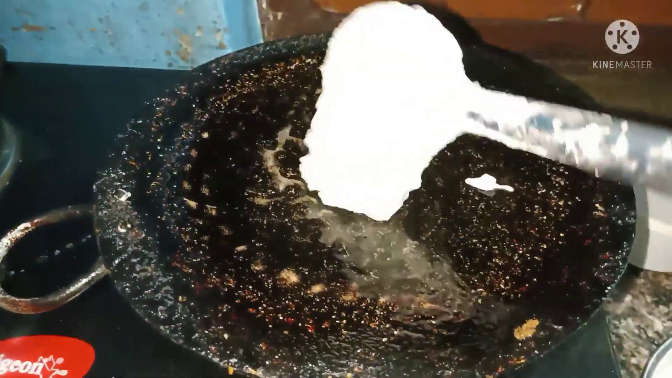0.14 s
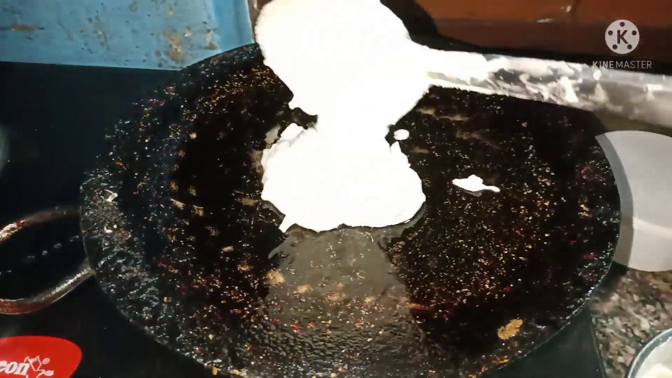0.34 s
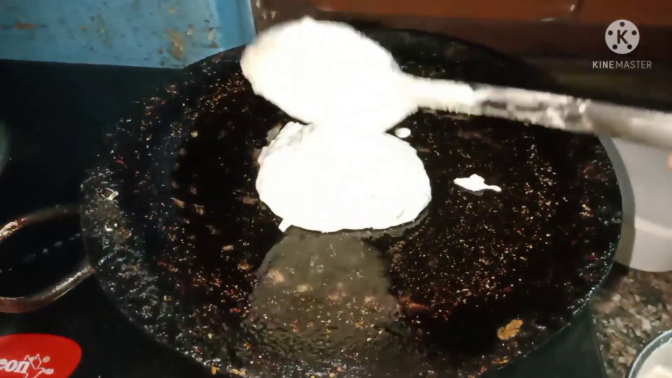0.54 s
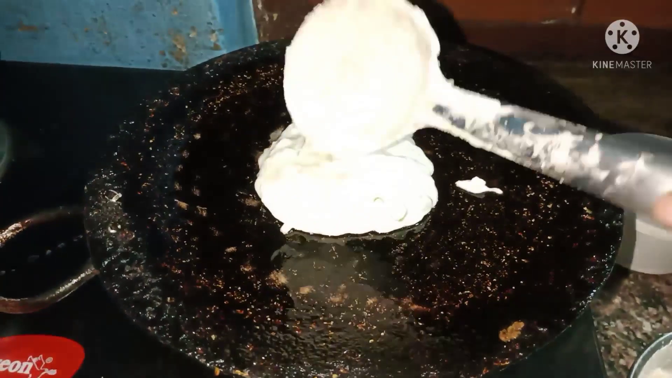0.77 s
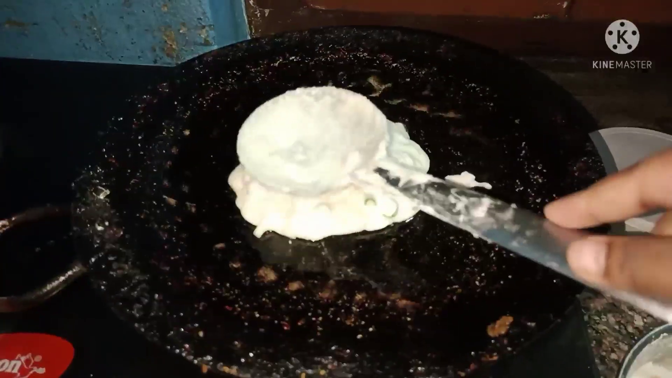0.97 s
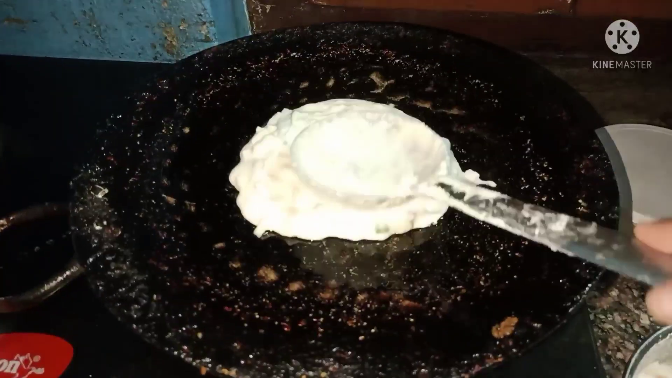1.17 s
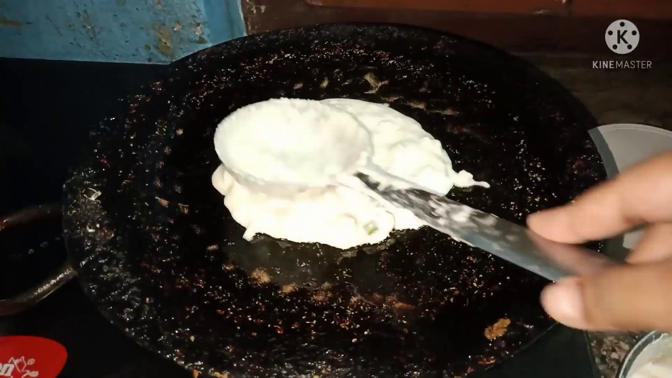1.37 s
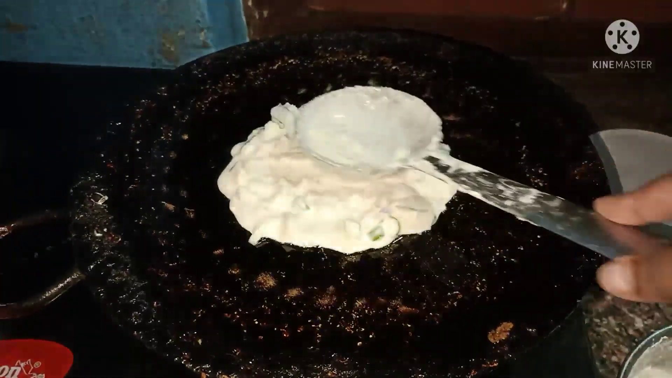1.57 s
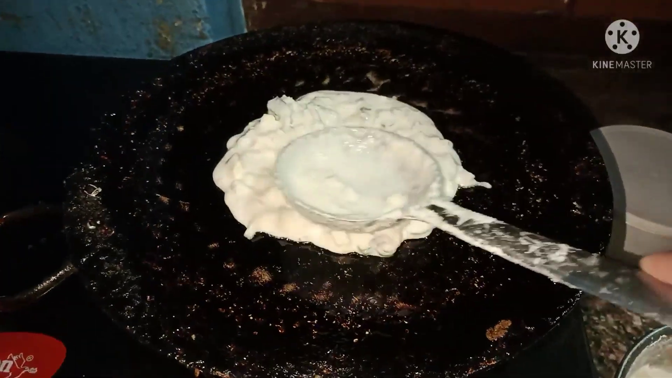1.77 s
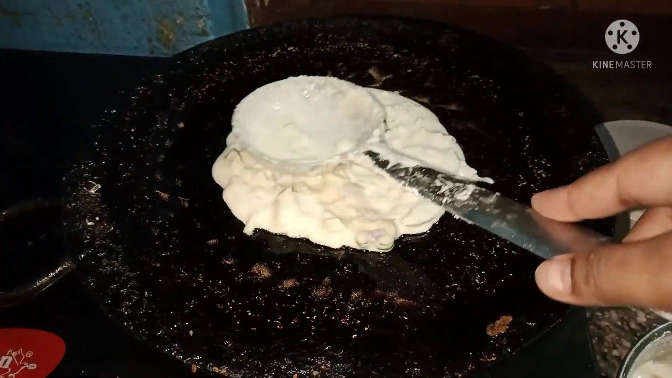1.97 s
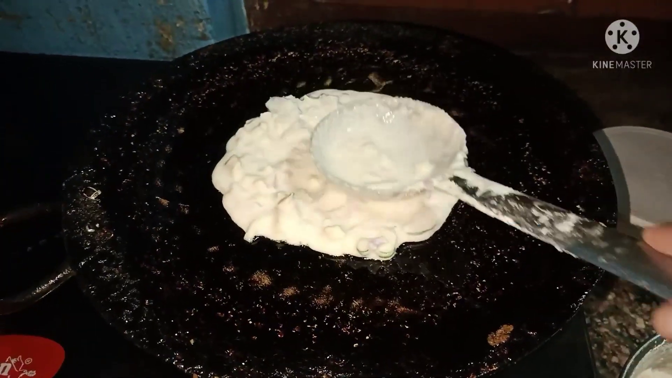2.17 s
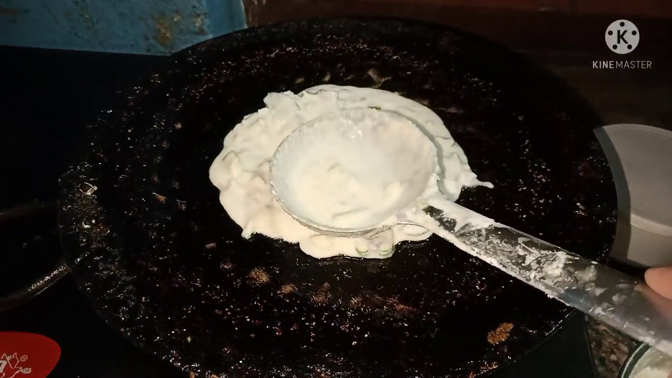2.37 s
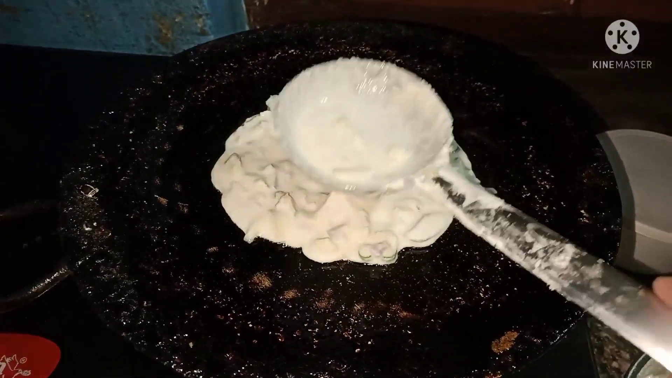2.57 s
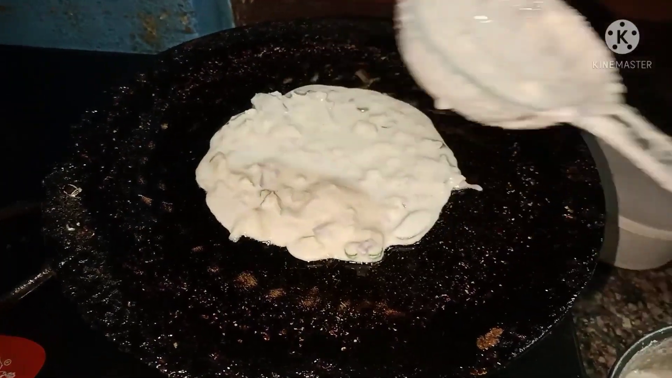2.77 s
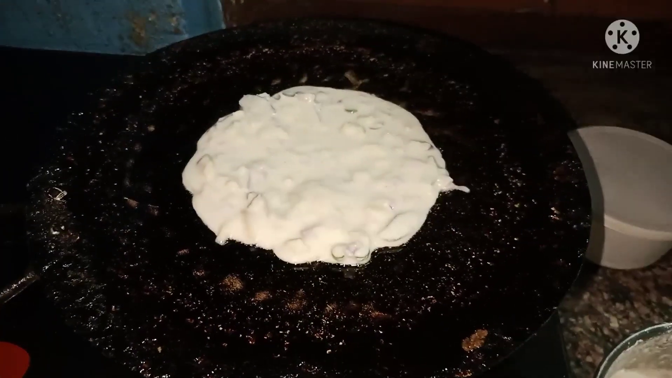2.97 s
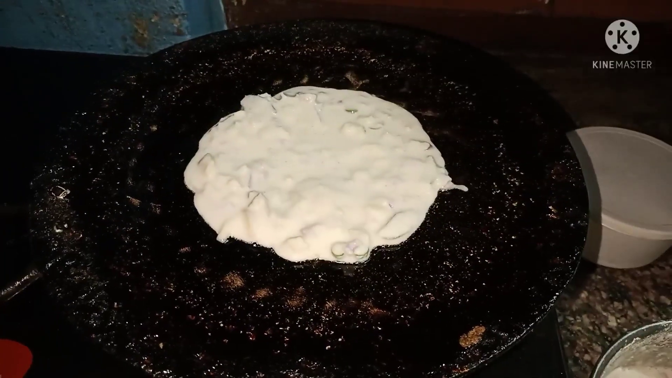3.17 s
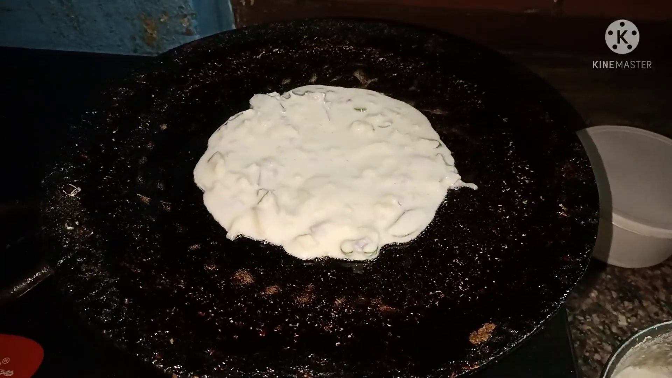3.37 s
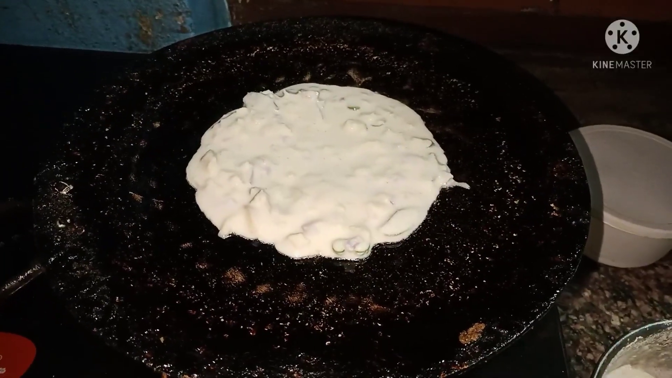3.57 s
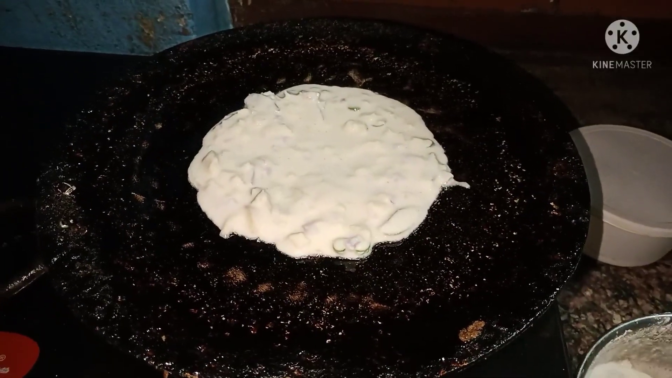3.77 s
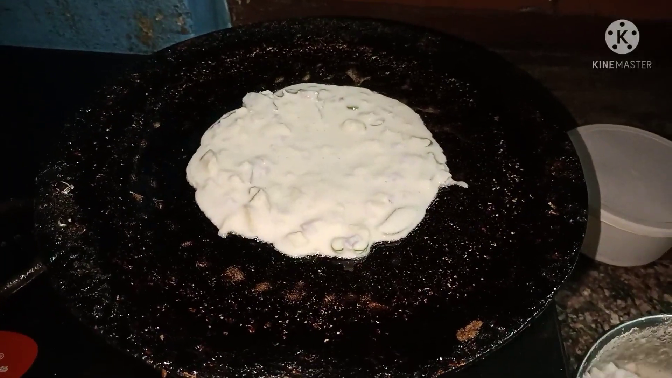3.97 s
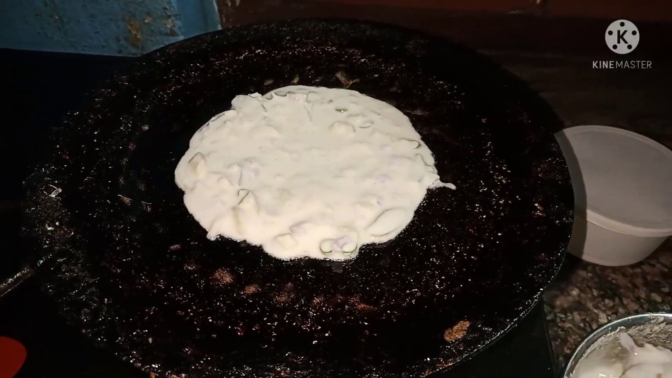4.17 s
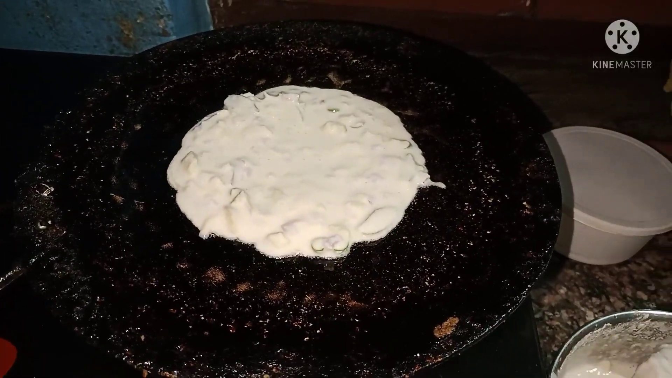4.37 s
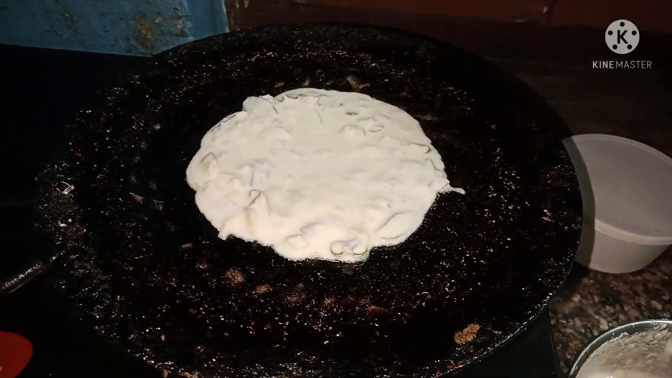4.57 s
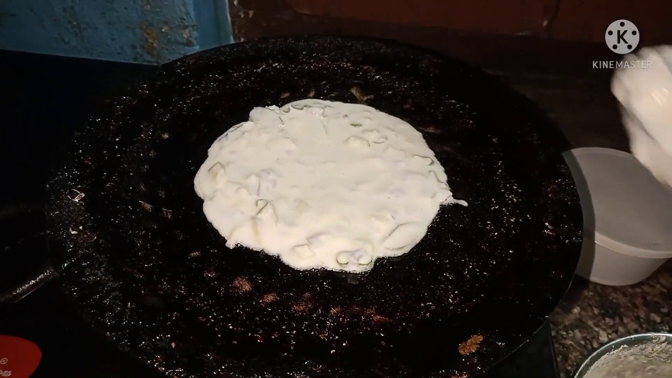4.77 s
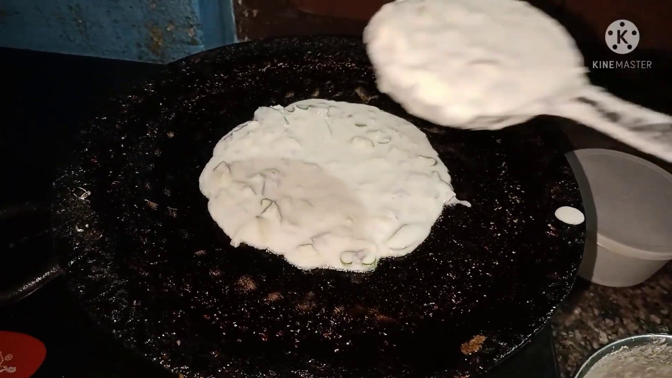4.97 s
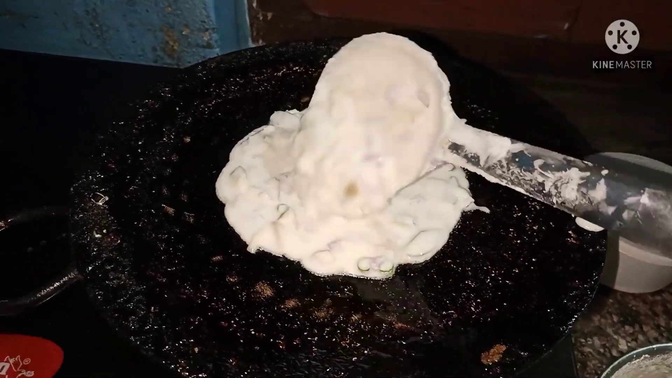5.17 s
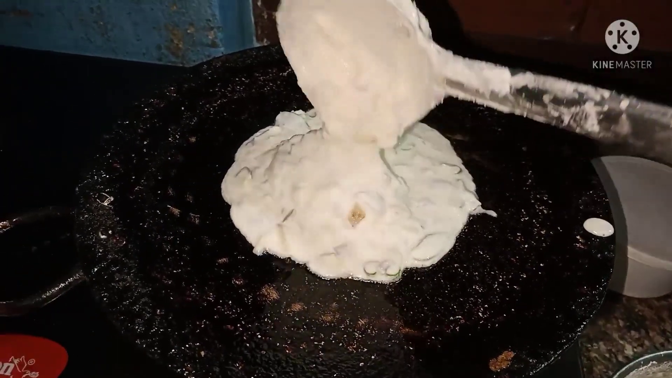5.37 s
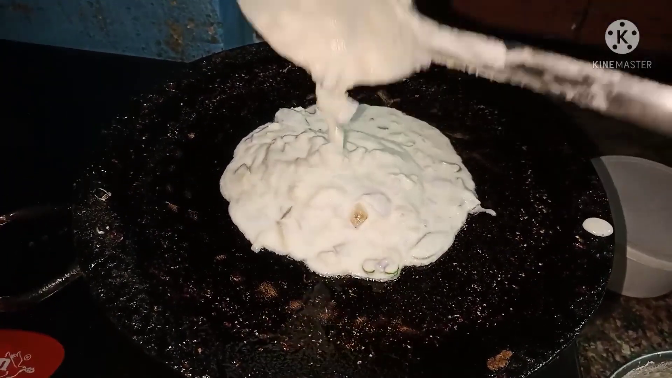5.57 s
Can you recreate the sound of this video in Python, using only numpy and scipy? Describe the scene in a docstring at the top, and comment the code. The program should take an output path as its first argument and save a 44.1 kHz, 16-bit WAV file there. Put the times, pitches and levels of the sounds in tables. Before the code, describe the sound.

Close, harsh sizzling as batter is poured and spread on hot iron, low blubbing under the ladle, thinning to sparse crackle and sputters.

```python
"""Batter sizzles on a hot iron griddle, close to the microphones in a small kitchen.
Random clicks stand for bursting steam bubbles; filters give them pitch and let the iron ring.
The sizzle thins to a fine fizz with single spits: cracks and bursts of noise that die away.
Swelling low tones make the ladle's soft knocks, the plops and the big bubbles; narrow noise makes
the singing edge and the glugging steam pockets. A faint rumble of the kitchen lies underneath."""
import sys
import numpy as np
from scipy import signal
from scipy.fft import rfft, irfft, next_fast_len
from scipy.io import wavfile

SR = 44100
rng = np.random.default_rng(int(sys.argv[2]) if len(sys.argv) > 2 else 0)


def inscribe(sig):
    """Save sig as 16-bit PCM at rate SR to the path in sys.argv[1].

    A 1-D sig is mono; a 2-D sig holds one channel per row.
    Samples are clipped to [-1, 1] before scaling.
    """
    pcm = np.round(np.clip(np.atleast_2d(sig).T, -1, 1) * 32767)
    wavfile.write(sys.argv[1], SR, pcm.astype(np.int16))


N = 247842  # samples, about 5.62 s
T = np.arange(N) / SR  # time of each sample, s

# Every pan or left-right value below is positive towards the left.
# Levels of layers are set before the small trims in their functions.

# colour of the steady room rumble: [f/Hz, gain/dB]
KITCHEN_COLOUR = [(20, -31), (45, -5), (70, -5), (90, -4.5), (118, 6), (145, 1.5), (167, 8), (190, 2),
                  (300, -3), (600, -9.5), (1200, -10.5), (3000, -30)]

# the batter hits the iron, boils hardest as the pool fills, and dies down as it sets: [t/s, level/dB]
BOIL_LEVEL = [(0.03, -50), (0.04, -37), (0.1, -40), (0.2, -34.5), (0.36, -33.5), (0.44, -30.5),
              (1.1, -32.5), (2.2, -35.5), (2.8, -38), (2.91, -42.5), (2.97, -40), (3.46, -45), (3.54, -44),
              (3.66, -42), (3.71, -50.5), (3.77, -45), (4.09, -46.5), (4.17, -53.5), (5.62, -63)]
# as the batter sets, bubbles come fewer and stand more apart: [t/s, factor on bubbles per second]
CROWDING = [(0.3, 1.15), (2.2, 0.8), (3.6, 0.44), (4.3, 0.23)]
# once the rim has set, steam gets out in separate puffs:
# [start t/s, length/s, swell of boiling/dB, swell of spray/dB, swell of fizz/dB]
PUFFS = [(2.957, 0.18, 0.5, 1, 1), (3.082, 0.18, 2, 1.5, -0.5), (3.428, 0.24, 0.5, 0.5, 3),
         (3.757, 0.11, 1.5, 4, 3.5), (3.96, 0.082, 0.5, 3.5, 1), (4.383, 0.13, 4, 11.5, 3.5),
         (4.637, 0.13, 5, 5.5, 2.5), (4.832, 0.069, 6.5, 13, 4), (4.961, 0.064, 4.5, 9.5, 2.5),
         (5.083, 0.2, 2, 5.5, 4), (5.353, 0.13, 7.5, 9, 5), (5.5, 0.096, 5, 7, 8.5)]
# colour of the boiling bubbles: [f/Hz, gain/dB]
SIZZLE_COLOUR = [(800, -30), (1300, -18), (1550, -5.5), (1900, 2), (2400, 1), (2680, -1.5), (3000, -4),
                 (3600, -11), (5000, -11), (9000, -51.5)]
# colour of the fine spray of oil: [f/Hz, gain/dB]
SPRAY_COLOUR = [(1500, -27), (2400, -21), (3400, 6), (4000, 3.5), (4900, -1.5), (5900, 2), (7000, -2),
                (9000, -12), (13000, -50.5)]
# ringing of the iron: [f/Hz, width/Hz, lift on the left/dB, lift on the right/dB]
IRON_RINGING = [(1387, 16, 9, 5), (1782, 20, 14, 3), (1965, 70, 1, 1), (2040, 55, 3.5, 4),
                (2277, 16, 12, 6), (2530, 70, 6, 4), (2960, 160, 2, 2), (3004, 24, 12, 12),
                (4570, 50, 6, 4), (5735, 40, 6, 2), (6490, 40, 6, 1)]

# bubbles under the thick of the batter: [t/s, level/dB]
FROTH_LEVEL = [(0.11, -52), (0.18, -43), (1.1, -43.5), (2.7, -46), (3.12, -53.5), (3.36, -69.5),
               (3.58, -66), (3.88, -72), (4.1, -74.5), (5.62, -84)]
# colour of these middling bubbles: [f/Hz, gain/dB]
MIDDLING_COLOUR = [(350, -10.5), (480, 4.5), (575, -3), (660, -3), (735, 3), (950, 3), (1150, 0),
                   (1400, -4.5), (1650, -0.5), (2400, -35)]

# tiny bursts in the oil film: [t/s, level/dB]
FIZZ_LEVEL = [(0.03, -49.5), (0.042, -46), (0.45, -41.5), (1.25, -41.5), (2.0, -46), (2.6, -46.5),
              (3.35, -48.5), (4.3, -48), (5.62, -54.5)]
# colour of the tiny bursts: [f/Hz, gain/dB]
FIZZ_COLOUR = [(1100, -51), (2000, -65), (3600, -21.5), (5200, 0), (6800, 1), (8000, 1), (10200, -3),
               (12500, 2.5), (14000, 3), (15500, 1)]

# the thin edge of the batter sings as it skates on steam; two filter passes make each whistle
# about a third narrower than its width setting: [f/Hz, width setting/Hz, level/dB, rise/s, fall/s]
SINGING = [(3424, 330, -42.5, 0.0051, 0.36), (5750, 420, -45, 0.11, .16), (5900, 230, -47, 0.072, 1.9)]

# droplets that spit, levels before colouring: [t/s, level/dB, left-right/dB, weight of mid-range/dB]
SPITS = [(0.0375, -52, -8, 4), (0.375, -30, 4, -12), (0.4283, -20, 4, -13), (0.8871, -24.5, -1, 5),
         (1.1238, -24, -4, -2), (1.157, -20, -6, -2), (1.4492, -21.5, -4, 0.5), (1.5723, -30, 2, 4),
         (2.391, -30, -1, -5), (2.4543, -28, 0, -5), (2.53, -26.5, 0, -3), (2.607, -31, 0, 4),
         (2.772, -30, 4, -5), (2.875, -25.5, -3, 0.5), (2.9773, -33, -2, 5), (3.2207, -25.5, 0, -2),
         (3.439, -28, -5, 2), (3.481, -29.5, -6, 3), (3.5657, -30, 0, -11), (3.6719, -34, 4, -6),
         (3.7395, -30, -6, -2), (3.7947, -31, -6, -4), (3.8323, -30.5, -9, -1), (3.8712, -27, 4, -4),
         (3.9129, -31, 5, -13), (4.006, -29, -4, 0.5), (4.0466, -31, 1.5, -9), (4.061, -27, -3, -1),
         (4.3725, -26, 0, -1), (4.4673, -30.5, -3, 1), (4.549, -34, 1, -1), (4.6503, -25.5, -3, -2),
         (4.794, -31, 1, -6), (4.8776, -38, 10, 3), (4.974, -32, 3, -12), (5.034, -34, 3, -2),
         (5.1102, -35, 8, -3), (5.264, -35, 10, -4), (5.3792, -24, 2, -1.5), (5.602, -26, 8, -23)]
# colour of a spit's sharp snap: [f/Hz, gain/dB]
SNAP_COLOUR = [(1000, -39), (4000, -50), (7000, -26), (10000, -2.5), (13500, 12), (16000, 7)]
# colour of a spit's mid-range: [f/Hz, gain/dB]
SPIT_BODY_COLOUR = [(1000, -24), (2500, -1), (6500, 9), (10000, 0.5), (16000, -28)]

# gurgles of big bubbles, squeezed out by the ladle or breaking through the batter:
# [start t/s, length before the fall/s, level/dB]
GURGLES = [(0.487, 0.31, -66), (0.78, 0.24, -59), (0.93, 0.466, -59), (1.485, 0.27, -63),
           (1.8, 0.37, -65.5)]
# colour of the big bubbles: [f/Hz, gain/dB]
BIG_COLOUR = [(170, -21), (270, -15), (305, -5), (352, 3.5), (430, 4), (500, -6), (620, -16), (850, -19)]
# single big bubbles from under the ladle: [start t/s, length/s, peak level/dB, middle f/Hz]
BLUBS = [(0.55, 0.081, -57, 343), (0.625, 0.066, -55, 629), (0.705, 0.07, -59, 343),
         (0.805, 0.077, -52, 433), (0.815, 0.093, -49.5, 578), (0.85, 0.1, -57, 345),
         (0.935, 0.06, -55, 355), (1.005, 0.065, -48.5, 356), (1.01, 0.095, -51, 586),
         (1.045, 0.076, -45.5, 353), (1.12, 0.077, -49.5, 620), (1.145, 0.11, -56, 342),
         (1.25, 0.075, -51, 347), (1.26, 0.068, -53, 491), (1.35, 0.062, -52, 367),
         (1.505, 0.075, -56, 349), (1.635, 0.08, -54.5, 351), (1.715, 0.1, -57, 488),
         (1.805, 0.071, -59.5, 358), (1.895, 0.12, -55, 351), (1.95, 0.1, -56.5, 484),
         (1.985, 0.064, -54, 345), (2.055, 0.069, -57, 356), (2.145, 0.09, -60, 364),
         (2.49, 0.06, -62.5, 362), (2.68, 0.057, -62, 357)]

# soft knocks of the ladle and plops of batter: [start t/s, peak level/dB, f/Hz, half the rise time/s]
PLOPS = [(0.794, -58, 117, 0.012), (1.246, -55.5, 114, 0.013), (2.48, -58, 113, 0.024),
         (3.049, -61, 124, 0.014), (3.318, -40, 379, 0.0097), (3.322, -49, 224, 0.0035),
         (3.873, -56, 120, 0.02), (4.398, -71, 131, 0.011), (5.139, -61, 115, 0.013),
         (5.414, -60, 122, 0.016)]

# dull rumble as the ladle is handled: [centre t/s, level/dB, length/s]
BUMPS = [(1.295, -66, 0.12), (2.53, -65, 0.1), (3.922, -68, 0.13), (4.514, -68, 0.23), (5.17, -62, 0.046),
         (5.447, -72, 0.089)]
# colour of that rumble: [f/Hz, gain/dB]
BUMP_COLOUR = [(20, -18), (60, -12.0), (130, -7), (220, -32), (500, -46)]

# pockets of steam in the setting batter: [start t/s, length/s, level/dB, first f/Hz, last f/Hz]
GLUGS = [(3.11, 0.1, -56.5, 931, 940), (3.18, 0.22, -65.5, 551, 540), (3.21, 0.099, -59.5, 827, 840),
         (3.33, 0.11, -65.5, 533, 513), (3.37, 0.14, -60.5, 1380, 1110), (3.377, 0.137, -60, 410, 340),
         (3.485, .07, -69, 863, 1000), (3.55, 0.086, -64, 1226, 1130), (3.565, .1, -61, 411, 350),
         (3.58, 0.087, -64, 498, 550), (3.605, 0.075, -62, 955, 940), (3.62, 0.074, -56, 1415, 1350),
         (3.665, 0.084, -60.5, 394, 350), (3.78, 0.085, -61, 916, 825), (3.78, 0.22, -67, 755, 777),
         (3.87, .08, -66, 1200, 1190), (3.905, 0.077, -67, 367, 384), (4.11, 0.057, -67, 440, 290),
         (4.39, .06, -65, 232, 180), (5.4, 0.053, -66, 370, 340), (5.4, 0.074, -69.5, 590, 544)]

# likeness of the two channels: [f/Hz, likeness 0-1]
CHANNEL_LIKENESS = [(60, 1), (200, 0.95), (400, 0.64), (700, 0.8), (850, 0.41), (1600, 0.45), (1780, 0),
                    (2000, 0.85), (2300, 0), (2600, 0.1), (3000, 0.13), (3300, 0), (6000, 0)]
# how far the left channel leads the right: [f/Hz, phase/radians]
LEFT_LEAD = [(200, 0.11), (600, 0.2), (720, -0.24), (900, -1.45), (1200, -0.68), (1500, -0.63),
             (2000, 0.32), (2300, -0.24), (3000, -0.26)]
# difference in colour of the two microphones: [f/Hz, left-right/dB]
LEFT_RIGHT_COLOUR = [(60, 2), (110, 0.5), (380, 1), (580, -5), (760, 1.5), (980, -2.5), (1400, -3.5),
                     (2380, 0.5), (5000, -0.5), (7400, 3), (10000, -2.5), (12000, 0), (15000, 5)]

PUFF_RISE_S, PUFF_FALL_S = 0.014, 0.035
FROTH_PUFF = 0.96  # the middling bubbles swell by this many times the boiling's puff dB
SPRAY_DB, SPRAY_FOLLOW = -10, 0.95  # spray: this offset plus this share of the boiling's dB
SING_START_S, SING_HOLD_S = 0.028, 0.14  # the hold includes the rise
GURGLE_RISE_S, GURGLE_FALL_S = 0.053, 0.067
GLUG_NARROWNESS = 5.5  # pitch divided by width setting
# the wider the pool, the lower the bubbles that fit under it: lowest pitch at first and later
DROP_HZ, POOL_HZ, SPREAD_S = 1930, 716, 0.19
LIFT_DB = -47  # a gurgle this strong lifts the batter enough to halve that pitch
ROOM_T60_S, ROOM_DB = 0.11, -4  # time for the echo to fall 60 dB, echo level
EDGE_HZ = 15760  # upper edge of the band


def amp(db):
    """Turns dB into a factor on the waveform."""
    return 10 ** (np.asarray(db) / 20)


def evened(x):
    """Scales a stereo pair so that the average of its channels has rms 1."""
    return x / np.sqrt(np.mean(x.mean(0) ** 2) + 1e-20)


def read(points, hz):
    """Reads a curve joined by straight lines over log frequency."""
    f, value = np.transpose(points)
    return np.interp(np.log(hz + 1), np.log(f + 1), value)


def level(rows):
    """Turns a dB curve over time into a gain for each sample."""
    return amp(np.interp(T, *np.transpose(rows)))


def add(mix, s, sound):
    """Mixes a sound in at time s, cut off at the end of the scene."""
    start = max(round(s * SR), 0)
    part = mix[:, start:][:, :sound.shape[-1]]
    part += sound[..., :part.shape[1]]


def drift(per_s):
    """Wanders at random with spread 1, held within bounds by tanh."""
    knots = np.arange(0, T[-1] + 1, 1 / (2 * per_s))
    x = np.interp(T, knots, np.tanh(rng.standard_normal(len(knots))))
    return x / x.std()


def envelope(s, length, rise_s, fall_s):
    """Rises from time s, holds until its length is over, and falls."""
    rise = np.clip((T - s) / rise_s, 0, 1)
    fall = np.clip(1 - (T - s - length) / fall_s, 0, 1)
    return rise * fall


def colour(x, points, modes=(), size=8192):
    """Filters with a spectrum and resonances, so that each click rings only after its start."""
    hz = np.fft.rfftfreq(size, 1 / SR)
    power = np.ones((2, len(hz)))
    for centre, width, *lift_db in modes:
        lift = amp(np.maximum(lift_db, 0))[:, None] ** 2 - 1
        power += lift / (1 + (2 * (hz - centre) / width) ** 2)
    log_gain = np.log(amp(read(points, hz)) * np.sqrt(power))
    # the phase that puts the response as early as possible follows from the gain
    mirrored = np.hstack([log_gain, log_gain[:, -2:0:-1]])
    causal = np.exp(np.conj(signal.hilbert(mirrored)))
    response = np.fft.ifft(causal).real[:, :size // 2]
    return signal.oaconvolve(x, response, axes=1)[:, :N]


def ports(x):
    """Makes long waves nearly alike at both microphones and short ones different."""
    size = next_fast_len(N, True)
    (a, b), hz = rfft(x, size), np.fft.rfftfreq(size, 1 / SR)
    same = np.clip(read(CHANNEL_LIKENESS, hz), 0, 1)
    left = same * a + np.sqrt(1 - same ** 2) * b
    left = left * np.exp(1j * read(LEFT_LEAD, hz))
    return irfft(np.array([left, a]), size)[:, :N]


def room(x):
    """Adds the short, dense echo of stove and walls as fading noise."""
    t = T[:SR // 2]
    tail = rng.standard_normal((2, len(t))) * amp(-60 * t / ROOM_T60_S)
    tail *= t > 0.002  # the echo starts after 2 ms
    tail /= np.linalg.norm(tail, axis=1, keepdims=True)
    return x + amp(ROOM_DB) * signal.oaconvolve(x, tail, axes=1)[:, :N]


def clicks(per_s, spread_db):
    """Random clicks, fewer as the batter sets; the spread makes a few much louder, or softer if negative."""
    crowd = np.interp(T, *np.transpose(CROWDING))
    size = amp(spread_db * np.minimum(rng.exponential(1, (2, N)), 5))
    chance = rng.uniform(-1, 1, (2, N))
    happens = abs(chance) < crowd * per_s / SR
    # fewer clicks are made larger, to keep the average power
    return size / np.sqrt(crowd) * np.sign(chance) * happens


def bursts(per_s, spread_db, clump_db, clumps_per_s, count=3):
    """Bubbles burst in clumps at several spots on the iron, each spot with its own echo."""
    out = 0
    for _ in range(count):
        spot = clicks(per_s / count, spread_db) * amp(clump_db * drift(clumps_per_s))
        out = out + room(spot)
    return ports(out)


def ringing(low_hz, high_hz, per_s, cycles, spread_db, count=24):
    """Single bubbles, each ringing at the pitch of its own size and fading to 37 % in some cycles."""
    hits, which, out = clicks(per_s, spread_db), rng.integers(0, count, (2, N)), 0
    for k, hz in enumerate(np.geomspace(low_hz, high_hz, count)):
        turn = 2 * np.pi * hz / SR
        r = np.exp(-hz / cycles / SR)
        resonance = [1, -2 * r * np.cos(turn), r * r]
        ring = signal.lfilter([np.sqrt(1 - r)], resonance, hits * (which == k))
        out = out + ring * np.sin(turn)
    return ports(out)


def spatters(per_s, spread_db, decay_s):
    """Tiny pops of oil, each a sudden spray of noise that dies within milliseconds."""
    fade = np.exp(-2 / (decay_s * SR))  # of the energy, per sample
    energy = signal.lfilter([1], [1, -fade], clicks(per_s, spread_db)[0] ** 2)
    return np.sqrt(energy) * rng.laplace(size=(2, N))


def whistle(hz, width_hz):
    """Steam sounds a narrow resonance: slowly fluttering noise moved to the pitch curve hz."""
    r = np.exp(-np.pi * width_hz / SR)
    warm_up = SR // 10
    a, b = rng.standard_normal((2, 2, len(hz) + warm_up))
    flutter = signal.lfilter([1], [1, -2 * r, r * r], a + 1j * b)[:, warm_up:]
    x = (flutter * np.exp(2j * np.pi * np.cumsum(hz) / SR)).real
    return x / x.std(1, keepdims=True)


def puffing():
    """Gains by which the puffs of steam swell the boiling, the spray and the fizz."""
    swells_db = 0
    for s, length, *swell_db in PUFFS:
        swells_db = swells_db + np.outer(swell_db, envelope(s, length, PUFF_RISE_S, PUFF_FALL_S))
    return amp(swells_db)


def spurting(per_s=13, fresh_db=1.5, set_db=6.0, length_s=0.013, count=120):
    """Small pockets of steam break out at random; they stand out once the rim has set."""
    gaps, sizes = rng.uniform(0.2, 1.8, (2, count))
    rim_set_s = CROWDING[-1][0]
    out = np.zeros((1, N))
    for s, size in zip(np.cumsum(gaps) / per_s, sizes):
        swell_db = np.sqrt(size) * (set_db if s > rim_set_s else fresh_db)
        add(out, s, swell_db * np.hanning(round(2 * length_s * SR)))
    return amp(out[0])


def gurgling():
    """Strength of the big bubbles, gurgle by gurgle, with overlapping ones added as powers."""
    power = 0
    for s, length, db in GURGLES:
        power = power + (amp(db) * envelope(s, length, GURGLE_RISE_S, GURGLE_FALL_S)) ** 2
    return np.sqrt(power)


def under_pool(x, steepness=16):
    """Weakens bubbles below the pitch that the width of the pool allows; lifted batter lets lower ones in."""
    hz, t, z = signal.stft(x, SR, nperseg=512, noverlap=384)
    lowest_hz = POOL_HZ + (DROP_HZ - POOL_HZ) * np.exp(-(T / SPREAD_S) ** 2)
    lowest_hz = lowest_hz / (1 + gurgling() / amp(LIFT_DB))
    z = z / np.sqrt(1 + (np.interp(t, T, lowest_hz) / (hz[:, None] + 1)) ** steepness)
    return signal.istft(z, SR, nperseg=512, noverlap=384)[1][:, :N]


def kitchen():
    """Faint, steady rumble of the room, made of coloured noise."""
    noise = ports(rng.standard_normal((2, N)))
    return amp(-72.0) * evened(colour(noise, KITCHEN_COLOUR))


def sizzle(single_db=-6, common_db=-8, crackle_db=-9):
    """Steam bubbles break out at the rim, many of one common size; they ring the iron and throw a spray of oil."""
    pops = bursts(per_s=2400, spread_db=2.5, clump_db=2.0, clumps_per_s=60)
    pops = evened(colour(pops, SIZZLE_COLOUR, IRON_RINGING))
    singles = ringing(low_hz=1400.0, high_hz=3689, per_s=150, cycles=41.0, spread_db=1.0)
    singles = evened(colour(singles, SIZZLE_COLOUR, IRON_RINGING))
    common = evened(ringing(low_hz=1883, high_hz=2121, per_s=130, cycles=21.0, spread_db=0.5))
    bubbles = evened(pops + amp(single_db) * singles + amp(common_db) * common)

    mist = evened(bursts(per_s=3000, spread_db=-0.5, clump_db=3.5, clumps_per_s=44))
    crackle = evened(spatters(per_s=300, spread_db=0.0, decay_s=0.0013))
    spray = evened(colour(mist + amp(crackle_db) * crackle, SPRAY_COLOUR, IRON_RINGING))

    surge, (boil_puff, spray_puff, _) = spurting(), puffing()
    boil_level = level(BOIL_LEVEL)
    boil = amp(-2.0) * surge * boil_puff * boil_level * bubbles
    spray_level = amp(SPRAY_DB) * boil_level ** SPRAY_FOLLOW
    return boil + spray_level * np.sqrt(surge) * spray_puff * spray


def bubbling(single_db=-3):
    """Larger, lower bubbles gurgle where the batter lies thick, as clumped bursts and ringing single bubbles."""
    froth = bursts(per_s=900, spread_db=2.5, clump_db=3.0, clumps_per_s=17)
    froth = evened(colour(froth, MIDDLING_COLOUR, IRON_RINGING))
    singles = ringing(low_hz=477.6, high_hz=1445.0, per_s=130, cycles=47.0, spread_db=0.2)
    singles = evened(colour(singles, MIDDLING_COLOUR))
    swell = puffing()[0] ** FROTH_PUFF
    return amp(-2.5) * level(FROTH_LEVEL) * swell * evened(froth + amp(single_db) * singles)


def fizz(crackle_db=-12, crackle_pan_db=-6, pips_db=-8, spatter_db=-3):
    """The smallest bubbles fizz on after the boiling dies down; the nearest are dry crackles without echo."""
    pops = evened(bursts(per_s=4200, spread_db=3.0, clump_db=4.0, clumps_per_s=28))
    pan = amp([[crackle_pan_db / 2], [-crackle_pan_db / 2]])
    near = pan * evened(clicks(per_s=270, spread_db=0.0))
    pips = evened(ringing(low_hz=5220, high_hz=15220, per_s=600, cycles=60, spread_db=1.0))
    oil = evened(spatters(per_s=330, spread_db=0.4, decay_s=0.0016))
    mix = pops + amp(crackle_db) * near + amp(pips_db) * pips + amp(spatter_db) * oil
    return amp(1.16) * level(FIZZ_LEVEL) * puffing()[2] * evened(colour(mix, FIZZ_COLOUR))


def singing():
    """Fuzzy whistles of narrow noise while the edge of the pool runs out over bare iron."""
    out = 0
    for hz, width, db, rise, fall in SINGING:
        tone = whistle(np.full(N, hz), width)
        out = out + amp(db) * tone * envelope(SING_START_S, SING_HOLD_S, rise, fall)
    return out


def spits(crack_db=7, spatter_db=-14.5, steam_db=-20):
    """A droplet cracks on the hot iron, spatters, and trails a puff of steam; the mid-range varies."""
    snap_s, steam_s = 0.0018, 0.04  # times to fade to 37 %
    snap, body, t = np.zeros((2, N)), np.zeros((2, N)), T[:SR // 5]
    for s, db, pan_db, body_db in SPITS:
        fade = amp(spatter_db) * np.exp(-t / snap_s) + amp(steam_db) * np.exp(-t / steam_s)
        spit = fade * rng.laplace(size=(2, len(t))) / np.sqrt(2)
        # one crack in each channel, each with its own tiny delay
        spit[[0, 1], rng.integers(0, SR // 700, 2)] += amp(crack_db)
        spit *= amp([[db + pan_db / 2], [db - pan_db / 2]])
        add(snap, s, spit)
        add(body, s + snap_s / 2, amp(body_db) * spit)
    return colour(snap, SNAP_COLOUR) + colour(body, SPIT_BODY_COLOUR)


def blubbering():
    """A low, churning bed of bubbles is squeezed out as the ladle presses down."""
    big = bursts(per_s=360, spread_db=2.5, clump_db=1.5, clumps_per_s=13)
    return amp(3.5) * gurgling() * evened(colour(big, BIG_COLOUR))


def blubs(glide=0.059):
    """A big bubble swells and dies on one low note that rises a little as it opens."""
    out = np.zeros((2, N))
    for s, length, db, hz in BLUBS:
        u = np.linspace(0, 1, round(length * SR))
        start_turn = rng.random() + rng.uniform(-0.08, 0.071, (2, 1))  # nearly alike left and right
        turns = np.cumsum(hz * (1 + glide * (u - 0.5))) / SR + start_turn
        add(out, s, amp(db) * np.sin(np.pi * u) * np.sin(2 * np.pi * turns))
    return out


def plops(sag=0.056):
    """The batter cushions each knock into a low note that swells and dies while its pitch sags."""
    out, t = np.zeros((2, N)), T[:SR // 3]
    for s, db, hz, half_rise in PLOPS:
        u = t / (2 * half_rise)
        turns = np.cumsum(hz * (1 + sag * np.exp(-u) - sag / 2)) / SR
        swell = (u * np.exp(1 - u)) ** 3  # peaks at 1 when u is 1
        add(out, s, amp(db) * swell * np.sin(2 * np.pi * turns))
    return out


def bumps():
    """Short swells of deep rumble, made of coloured noise."""
    swell = sum(amp(db) * np.exp(-(2 * (T - s) / length) ** 2) for s, db, length in BUMPS)
    noise = ports(rng.standard_normal((2, N)))
    return swell * evened(colour(noise, BUMP_COLOUR))


def glugs():
    """Each pocket of steam swells and dies as narrow noise, gliding in pitch as its size changes."""
    out, t = np.zeros((2, N)), T[:SR // 4]
    for s, length, db, first_hz, last_hz in GLUGS:
        u = np.minimum(t / length, 1)
        arch = np.sin(np.pi * u)
        pitch_hz = first_hz + (last_hz - first_hz) * u
        glug = arch * whistle(pitch_hz, first_hz / GLUG_NARROWNESS)
        # evens out chance differences in strength
        glug *= np.sqrt(np.mean(arch ** 2)) / glug.std(1, keepdims=True)
        add(out, s, amp(db) * glug)
    return ports(out)


def scene():
    """Everything on and around the griddle."""
    boiling = under_pool(sizzle() + bubbling())
    high = fizz() + singing() + spits()
    low = blubbering() + blubs() + plops() + bumps() + glugs()
    return kitchen() + boiling + high + low


def record(dry):
    """The two microphones differ a little in colour; then the highest treble is cut."""
    lean_db = read(LEFT_RIGHT_COLOUR, np.fft.rfftfreq(N, 1 / SR))
    heard = irfft(rfft(dry) * amp([lean_db / 2, -lean_db / 2]), N)
    low_pass = signal.firwin(301, EDGE_HZ, window=("kaiser", 9), fs=SR)
    return signal.oaconvolve(heard, low_pass[None], "same")


dry = scene()
out = record(dry)
inscribe(out)
```